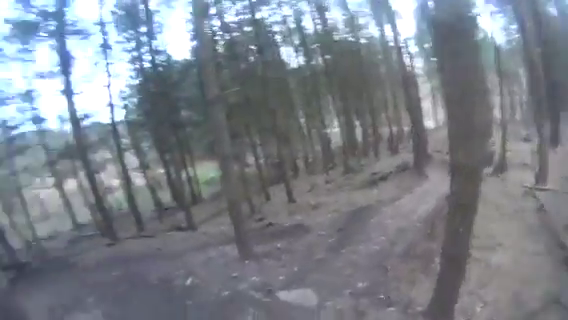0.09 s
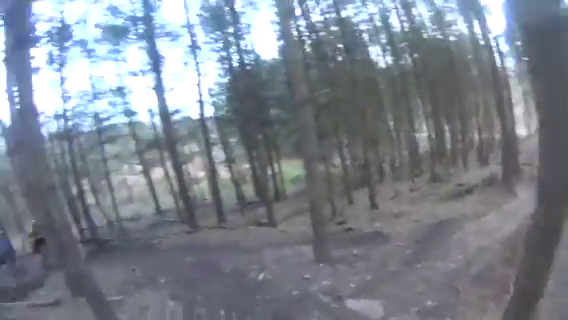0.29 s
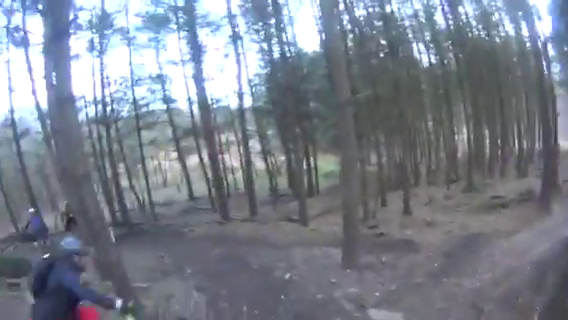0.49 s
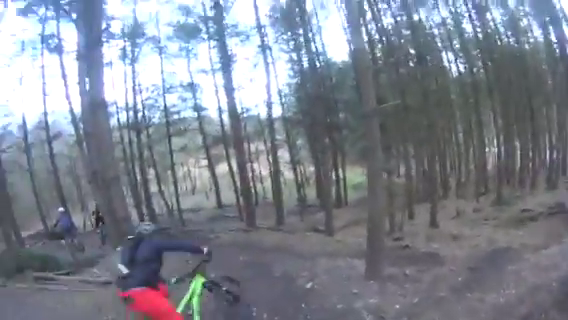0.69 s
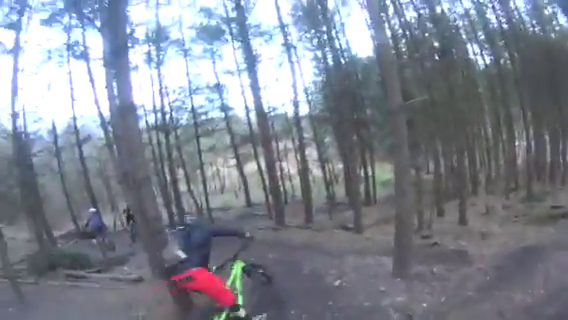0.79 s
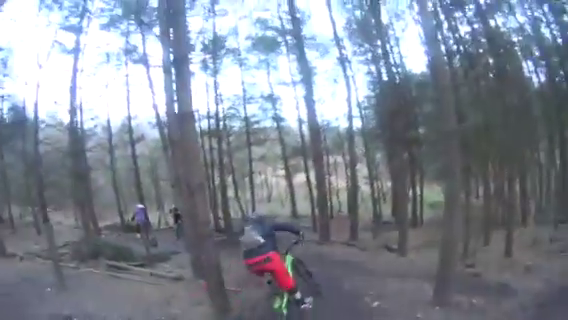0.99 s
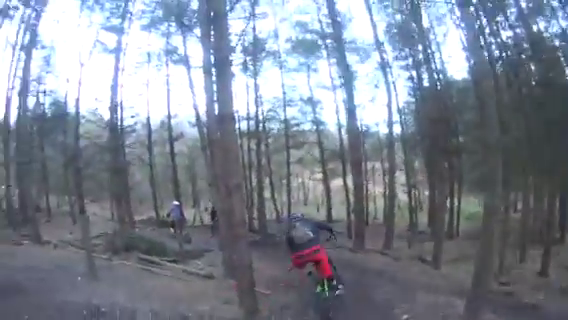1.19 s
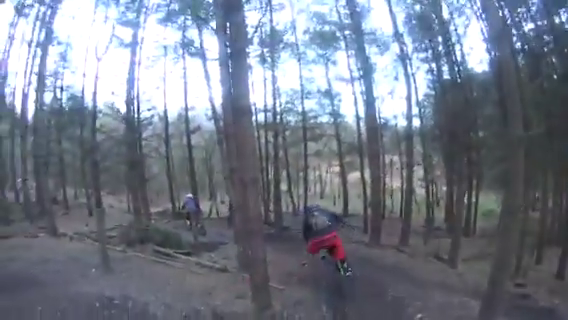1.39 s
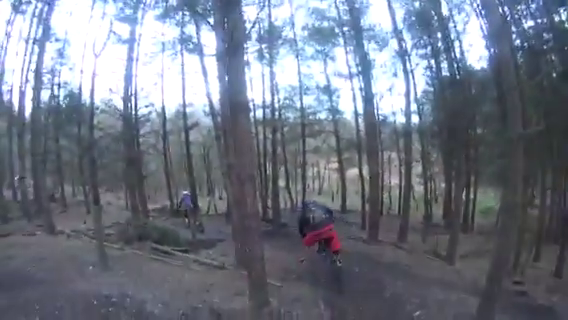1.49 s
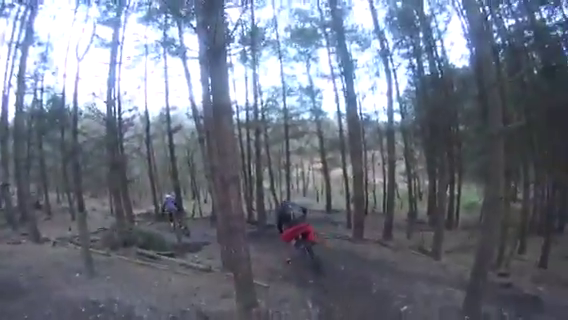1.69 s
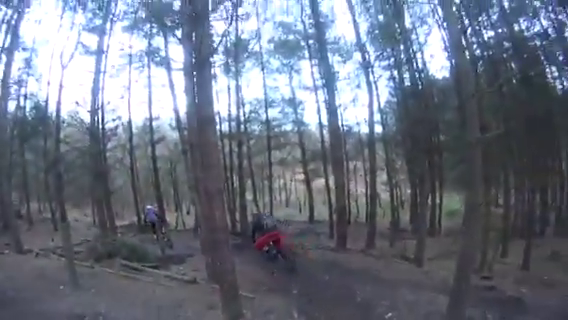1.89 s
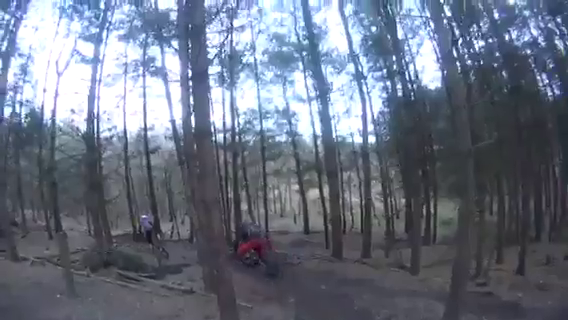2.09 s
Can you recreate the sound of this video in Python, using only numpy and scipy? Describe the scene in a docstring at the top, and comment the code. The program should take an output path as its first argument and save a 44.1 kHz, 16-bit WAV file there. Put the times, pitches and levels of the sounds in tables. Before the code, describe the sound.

Mountain bike tyres crunch over a forest dirt trail with a low whirr and hollow hum. From about 0.2 seconds they scrub in short rasps, with tiny rubber squeaks and dry stone knocks, loudest around 0.5 to 0.6 seconds as the bike passes close. After a few more knocks near 0.8 seconds, it rolls away with a quieter gritty hiss until 2 seconds. Soft thumps and wind buffet the microphone underneath.

```python
"""Tyres crunch up a dirt trail in a pine wood, then a mountain bike sweeps close past the microphone.
The tread grips and slips in short rasping scrubs, squeaks and knocks stones; the bike rolls away over
grit. Tread whirr, a hollow hum, soft thumps and gusts on the microphone lie underneath. Two small
microphone ports colour the sound, the right one ringing near 3 kHz; trunks scatter the closest sounds."""
import sys
import numpy as np
from scipy import signal
from scipy.fft import rfft, irfft
from scipy.io import wavfile
from scipy.ndimage import uniform_filter1d, minimum_filter1d

SR = 44100
rng = np.random.default_rng(int(sys.argv[2]) if len(sys.argv) > 2 else 0)


def store_wav(level_fs):
    """Save 16-bit WAV to argv[1]."""
    pcm = np.round(np.clip(np.atleast_2d(level_fs), -1, 1) * 32767)
    wavfile.write(sys.argv[1], SR, pcm.T.astype(np.int16))


N = 92610
T = np.arange(N) / SR

# Tyre scrubs close by. Each row: start and length in seconds, then low ring, high ring and grit in dB.
SCRUBS = [(0.199, 0.01, -35.5, -30, -41), (0.256, 0.011, -40, -29.5, -33),
          (0.272, 0.016, -28.5, -22.5, -32), (.434, 0.0099, -34.5, -28, -40),
          (0.445, 0.024, -25.5, -24, -40), (.460, 0.021, -24, -21, -29.5), (.472, 0.033, -34, -18, -28.5),
          (0.508, 0.024, -26, -22, -31.5), (.530, 0.025, -20, -18, -26.5),
          (0.55, 0.0096, -17.5, -19, -25.5), (0.564, 0.023, -21.5, -23.5, -30.5),
          (0.592, .018, -24, -24.5, -40), (0.639, 0.035, -36.5, -31.5, -34),
          (0.734, .018, -31.5, -31.5, -33.5), (0.756, 0.024, -29, -25.5, -33.5),
          (0.785, .022, -28.5, -26.5, -25.5), (.850, 0.016, -59, -32, -31.5),
          (0.937, 0.018, -40, -34.5, -38), (1.031, 0.0092, -36, -33.5, -32.5),
          (1.233, 0.013, -41.5, -41.5, -42), (1.65, 0.011, -68, -41, -44), (1.925, 0.039, -53, -42.5, -46)]
# Rubber squeaks. Each row: centre and half length in seconds, pitch in Hz, level in dB.
SQUEAKS = [(0.277, 0.0049, 1410, -20.5), (0.2886, 0.0036, 2550, -14.5), (.465, 0.0061, 1465, -17.5),
           (0.512, 0.0021, 2470, -17.5), (0.6086, 0.0034, 2230, -17)]
# Stones under the tyres. Each row: start in seconds, peak level in dB.
STONES = [(.4512, -14), (0.4875, -16), (0.5056, -13), (0.5081, -17), (0.5548, -6), (0.5668, -6.5),
          (0.5953, -8.5), (0.6002, -15), (.6040, -7), (.6090, -8), (0.7523, -13), (0.7754, -17),
          (0.7864, -16), (0.798, -26), (0.8057, -7.5), (1.0499, -23.5), (2.063, -30)]
# Tyres rolling past. Each row: time in seconds, crunch level in dB, hiss level in dB.
ROLL_LEVELS = [(0, -36.5, -61), (.06, -40.5, -59), (.12, -41.5, -56), (.22, -32, -44), (.31, -33.5, -44),
               (.40, -35.5, -41), (.47, -29, -44), (.615, -33, -42), (.65, -31.5, -30.5),
               (.71, -32.5, -34.5), (.83, -33.5, -32), (.97, -38.5, -36.5), (1.17, -40, -37),
               (1.27, -40, -41.5), (1.33, -40, -43), (1.42, -40.5, -43), (1.50, -39, -40.5),
               (1.66, -38.5, -41.5), (1.87, -40.5, -43), (1.95, -42, -43), (2.1, -39.5, -41)]
# Port ring, tread whirr and wind at the microphone. Each row: time in seconds, level in dB.
PORT_RING_LEVELS = [(0, -64), (.6, -40.5), (.8, -38.5), (1.05, -45), (1.35, -50.5), (1.52, -44),
                    (1.7, -49.5), (2.0, -47.5), (2.1, -49)]
WHIRR_LEVELS = [(0, -43), (.09, -45), (.12, -54), (.17, -44.5), (.24, -57), (.33, -48.5), (.41, -47),
                (.55, -66), (.85, -67), (1.15, -68), (1.35, -59), (1.55, -67), (1.8, -56), (2.1, -67)]
WIND_LEVELS = [(0, -42.5), (.47, -48.5), (.58, -61), (.645, -45), (.70, -48), (.78, -50.5), (1.24, -59.5),
               (1.34, -44), (1.41, -42), (1.46, -57), (1.6, -55.5), (1.70, -49), (1.79, -51), (2.1, -63)]
# Bumps that swell the hum. Each row: centre in seconds, level in dB, half length in seconds.
BUMPS = [(0.069, -32.5, 0.021), (0.186, -41.5, 0.056), (0.374, -41.5, 0.024), (0.412, -37, 0.014),
         (0.726, -40.5, 0.02), (1.286, -43, 0.027), (1.814, -49, 0.066), (2.025, -50, 0.041)]
# Thumps of air and ground. Each row: centre and half length in seconds, pitch in Hz, level in dB.
THUMPS = [(0.534, 0.012, 60, -39), (0.679, 0.0082, 68, -30.5), (0.72, .016, 42, -30),
          (1.508, 0.021, 38, -40.5), (1.656, 0.012, 55, -43)]

# The tone colour of each source. Each row: frequency in Hz, relative level in dB.
LOW_RING_COLOUR = [(100, -36), (450, -27), (750, -23.5), (950, -17), (1080, -5.5), (1250, -4), (1450, 2),
                   (1600, -10.5), (1900, -22), (2400, -26), (6000, -67)]
HIGH_RING_COLOUR = [(300, -57.5), (1500, -15.5), (1900, -5.5), (2130, -4.5), (2300, -0.5), (2530, 0.5),
                    (2780, -3), (2950, -1), (3400, -7), (4200, -26.5), (9000, -40)]
GRIT_COLOUR = [(500, -14), (2500, -38), (3600, 7.5), (4900, 5.5), (5600, -1.5), (6400, 1.5), (8000, -2.5),
               (9200, -9.5), (11000, -42.5)]
STONE_COLOUR = [(100, -19), (550, -22.5), (1100, 7), (1400, -4), (1750, 12), (2500, 3.5), (3200, -7.5),
                (4200, -17), (8000, -20), (11000, -44)]
CRUNCH_COLOUR = [(150, -20), (300, -13.5), (480, -12.5), (880, -7), (1080, 1.5), (1400, 4), (1850, -7),
                 (2200, -5.5), (2550, -0.5), (2780, -0.5), (2980, 0.5), (3200, -3.5), (3450, -10),
                 (4300, -11), (6000, -14.5), (11000, -40.5)]
HISS_COLOUR = [(1000, -32), (3000, 5.5), (4200, -3), (5050, 5), (5600, -1), (6050, 0.5), (7100, -1.5),
               (8100, 3), (8900, 1.5), (9700, -4), (10300, 0.5), (11000, -11)]
PORT_RING_COLOUR = [(2000, -49), (2800, -15), (2960, -1), (3130, -13), (4200, -50.5)]
WHIRR_COLOUR = [(120, -16), (250, -9.5), (350, -9.5), (480, -13.5), (590, -7.5), (660, 1.5), (725, 2),
                (800, -5), (950, -10), (1400, -29)]
DRONE_COLOUR = [(40, -38), (90, -8.5), (130, -3.5), (172, -2), (210, -9.5), (280, -19), (700, -41)]
WIND_COLOUR = [(15, -8.5), (34, 1.5), (55, -13.5), (85, -10.5), (130, -18), (300, -27.5), (1000, -53)]

# Port balance for trail sounds and for the closest ones. Each row: frequency in Hz, left minus right in dB.
PORT_BALANCE = [(100, 0), (600, 3.5), (1300, 5), (2000, 6.5), (2500, 8.5), (2820, -6), (3100, 2.5),
                (3600, 6.5), (5200, 6.5), (6100, 4), (9500, 5), (10300, 4.5)]
NEAR_BALANCE = [(100, -10), (600, 4), (1900, 1), (2500, 7), (2900, 0), (3500, 5), (10000, 3)]
# Port phase for the same two. Each row: frequency in Hz, lead of the left port in radians.
PORT_PHASE = [(40, 0.12), (170, 0.72), (550, 1.87), (1200, 1.78), (1900, 1.67), (2550, 0.57), (2900, 1.88),
              (4100, 0.63), (5700, 0.17), (10000, 0.35)]
NEAR_PHASE = [(40, .1), (600, 1.03), (2070, 1.53), (2700, 0.65), (3270, 1.2), (4500, 0.57), (9000, 1.16)]
# The tyres' drift from left to centre. Each row: time in seconds, dB added to the port balance.
ROLL_PAN = [(0, -1), (.55, -1), (.9, -3.5), (2.1, -4)]

SLIPS_PER_S, SLIP_JITTER, SLIP_SCATTER_DB, SLIP_DECAY_S = 330, .4, 1.5, 0.0018
SCRUB_ATTACK_S, SCRUB_RELEASE_S = 0.0043, 0.0057
RASP_DB, STEADY_SPRAY_DB = -0.5, -2.5
GRAINS_PER_S, GRAIN_SCATTER_DB, GRAIN_DB = 2800, 2, -4.5
ROLL_FLUTTER_DB, WHIRR_FLUTTER_DB, FLUTTER_PER_S = 1.3, 2, 41.6
HUM_HZ, DRONE_DB, DRONE_FADE_DB_PER_S = 165.9, -54, 5.5
SQUEAK_WANDER, BASS_WANDER = 0.0193, .075  # fractions of the pitch
PORT_RING_PAN_DB = -4  # left minus right
ROLL_DIFFUSE_DB, TRUNKS_DB, TRUNKS_T60_S = -6, -9, 0.098
LIMIT_DB, LIMIT_HOLD_S, TOP_HZ = -7, 0.0013, 11050


def scrubs():
    """The tread grips and slips unevenly; each slip rasps, rings two hollow resonances and sprays grit."""
    spacing, strength = rng.standard_normal((2000, 2)).T
    at = (np.cumsum(np.exp(SLIP_JITTER * spacing)) * SR / SLIPS_PER_S).astype(int)
    slips = np.bincount(at[at < N], amp(SLIP_SCATTER_DB * strength[at < N]), N)
    slip_decays = signal.lfilter([1], [1, -np.exp(-1 / (SLIP_DECAY_S * SR))], slips)
    rasp = unit(slip_decays * rng.standard_normal(N))
    drive = unit(slips) + amp(RASP_DB) * rasp
    spray = rasp + amp(STEADY_SPRAY_DB) * rng.standard_normal(N)
    envelopes = np.zeros((3, N))
    for start, length, *db in SCRUBS:
        attack = np.clip((T - start) / SCRUB_ATTACK_S + .5, 0, 1)
        release = np.exp(-np.maximum(T - start - length, 0) / SCRUB_RELEASE_S)
        envelopes = np.maximum(envelopes, amp(db)[:, None] * attack * release)
    layers = colour(drive, LOW_RING_COLOUR), colour(drive, HIGH_RING_COLOUR), colour(spray, GRIT_COLOUR)
    return sum(envelope * unit(layer) for envelope, layer in zip(envelopes, layers))


def squeaks():
    """Slipping rubber locks to a resonance and sings for a few milliseconds."""
    return sum(amp(db) * swell(at, half_s) * wavering(hz, SQUEAK_WANDER, rate=258)
               for at, half_s, hz, db in SQUEAKS)


def stones():
    """The tread strikes stones, each a short dry knock."""
    blows = np.zeros(N)
    for start, db in STONES:
        blows[int(start * SR)] += amp(db)
    one_knock = colour(signal.unit_impulse(N), STONE_COLOUR)
    return colour(blows, STONE_COLOUR) / np.abs(one_knock).max()


def rolling():
    """Tyres crunch and hiss over loose dirt, fluttering with the ground; heard direct and diffuse."""
    flutter = amp(ROLL_FLUTTER_DB * walk(FLUTTER_PER_S))

    def tread():
        crunch = unit(colour(grains(), CRUNCH_COLOUR)) * amp(curve(ROLL_LEVELS, column=1))
        hiss = unit(colour(grains(), HISS_COLOUR)) * amp(curve(ROLL_LEVELS, column=2))
        return flutter * (crunch + hiss)

    direct = pan(ports(tread(), PORT_BALANCE, PORT_PHASE), curve(ROLL_PAN))
    diffuse = np.array([tread(), tread()])
    return direct + amp(ROLL_DIFFUSE_DB) * diffuse


def port_ring():
    """Rolling grit rings a narrow resonance near 3 kHz, strongest in the right microphone port."""
    ring = unit(colour(grains(), PORT_RING_COLOUR))
    return pan(ring * amp(curve(PORT_RING_LEVELS)), PORT_RING_PAN_DB)


def whirr():
    """Tread blocks drum on the ground: a dull fluttering rush around one pitch."""
    return noise(WHIRR_COLOUR) * amp(curve(WHIRR_LEVELS) + WHIRR_FLUTTER_DB * walk(FLUTTER_PER_S))


def hum():
    """A hollow low drone fades slowly; a wavering note swells over it on bumps."""
    bumps = sum(amp(db) * swell(at, half_s) for at, db, half_s in BUMPS)
    note = wavering(HUM_HZ, BASS_WANDER, rate=74.6)
    drone = noise(DRONE_COLOUR) * amp(DRONE_DB - DRONE_FADE_DB_PER_S * (T - 1.5))
    return bumps * note + drone


def thumps():
    """Air and ground give short soft pushes of bass."""
    return sum(amp(db) * swell(at, half_s) * wavering(hz, BASS_WANDER, rate=32)
               for at, half_s, hz, db in THUMPS)


def wind():
    """Gusts buffet the microphone with a low rumble."""
    return noise(WIND_COLOUR) * amp(curve(WIND_LEVELS))


def trunks(x):
    """The pine trunks scatter a faint short tail back to the microphone."""
    tail = rng.standard_normal((2, N)) * np.exp(-np.log(1000) * T / TRUNKS_T60_S)
    return signal.fftconvolve(x[None], unit(tail) / np.sqrt(N), axes=1)[:, :N] * amp(TRUNKS_DB)


def ports(x, balance, phase):
    """The two microphone ports hear one sound with different level and phase."""
    left = amp(over_hz(balance) / 2) * np.exp(1j * over_hz(phase) / 2)
    return irfft(rfft(x, 2 * N) * np.array([left, 1 / left]))[:, :N]


def pan(x, db):
    """Tilt a sound by db, left minus right."""
    return x * amp(np.array([[1], [-1]]) * db / 2)


def grains():
    """Dense ticks of crushed dirt over a smooth rush."""
    ticks = (rng.random(N) < GRAINS_PER_S / SR) * rng.choice([-1, 1], N)
    strength = amp(GRAIN_SCATTER_DB * np.minimum(rng.exponential(size=N), 5))
    return unit(amp(GRAIN_DB) * unit(ticks * strength) + rng.standard_normal(N))


def noise(rows):
    """Coloured noise of rms 1."""
    return unit(colour(rng.standard_normal(N), rows))


def colour(x, rows):
    """Causal filter with the given spectrum, so that clicks ring in its peaks."""
    cepstrum = irfft(np.log(amp(over_hz(rows))))
    cepstrum[1:N] *= 2  # fold onto positive time for minimum phase
    cepstrum[N + 1:] = 0
    return irfft(rfft(x, 2 * N) * np.exp(rfft(cepstrum)))[:N]


def wavering(hz, wander, rate):
    """A tone of rms 1 whose pitch wanders."""
    pitch = hz * (1 + wander * walk(rate))
    return np.sqrt(2) * np.sin(2 * np.pi * np.cumsum(pitch) / SR)


def walk(rate):
    """Random wandering of rms 1, smoothed over 1 / rate seconds."""
    span = max(int(SR / rate), 2)
    return unit(uniform_filter1d(uniform_filter1d(rng.standard_normal(N), span), span))


def swell(at, half_s):
    """A bell-shaped rise and fall."""
    return np.exp(-((T - at) / half_s) ** 2)


def curve(rows, column=1):
    """One column of a table, joined by straight lines in time."""
    rows = np.array(rows)
    return np.interp(T, rows[:, 0], rows[:, column])


def over_hz(rows):
    """A table joined by straight lines on a log-frequency axis."""
    rows = np.array(rows)
    hz = np.arange(N + 1) * SR / (2 * N)
    return np.interp(np.log(hz + 1), np.log(rows[:, 0]), rows[:, 1])


def amp(db):
    """Decibels to gain."""
    return 10 ** (np.asarray(db) / 20)


def unit(x):
    """Scale to rms 1."""
    return x / np.sqrt(np.mean(x ** 2) + 1e-18)


def scene():
    """From the trailside: close scrubs and stones over rolling tyres, hum and wind."""
    near = scrubs() + squeaks() + stones()
    low = whirr() + hum() + wind() + thumps()
    close_pass = ports(near, NEAR_BALANCE, NEAR_PHASE) + trunks(near)
    return close_pass + rolling() + port_ring() + ports(low, PORT_BALANCE, PORT_PHASE)


def record(dry):
    """A fast limiter holds the peaks; the top is cut steeply."""
    hold = int(LIMIT_HOLD_S * SR)
    gain = np.minimum(1, amp(LIMIT_DB) / (np.abs(dry).max(axis=0) + 1e-9))
    limited = dry * uniform_filter1d(minimum_filter1d(gain, hold), hold)
    top_cut = signal.ellip(12, .2, 80, TOP_HZ, fs=SR, output="sos")
    return signal.sosfilt(top_cut, limited)


dry = scene()
out = record(dry)
store_wav(out)
```